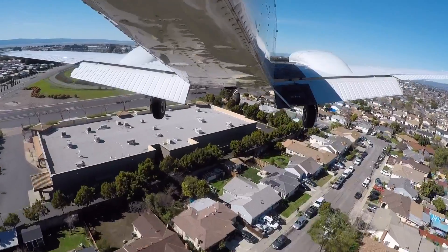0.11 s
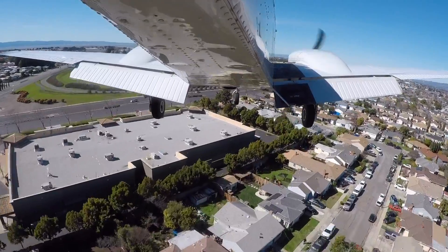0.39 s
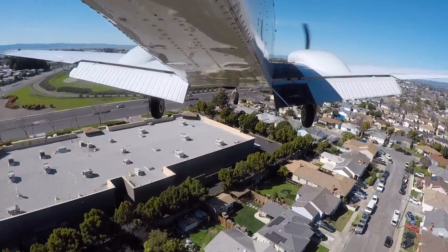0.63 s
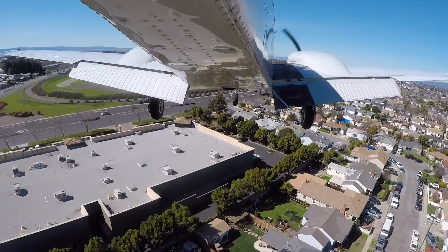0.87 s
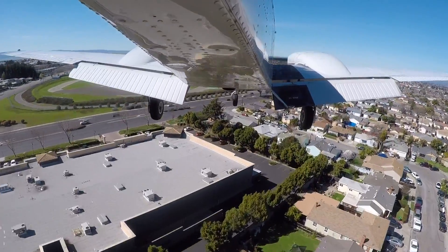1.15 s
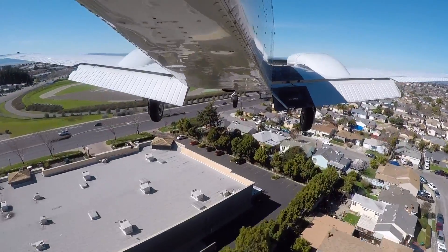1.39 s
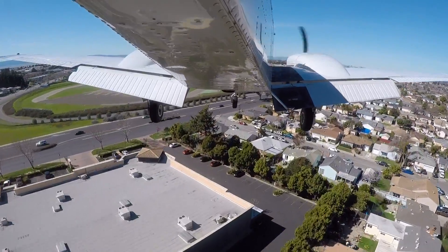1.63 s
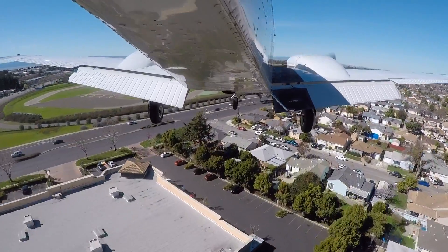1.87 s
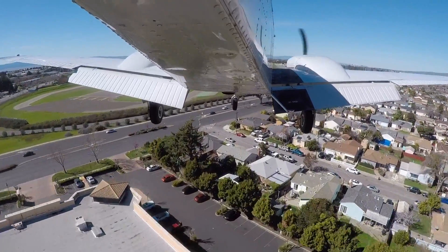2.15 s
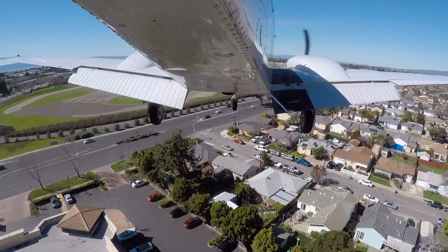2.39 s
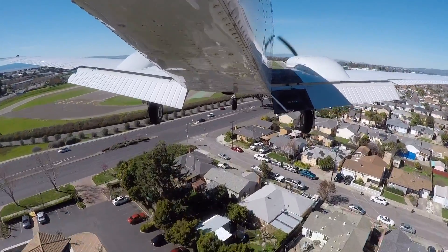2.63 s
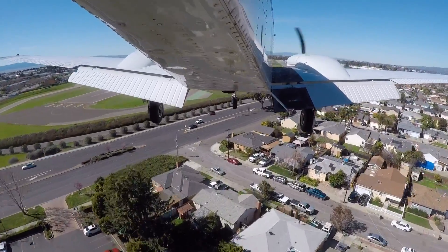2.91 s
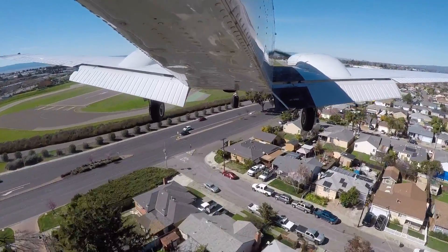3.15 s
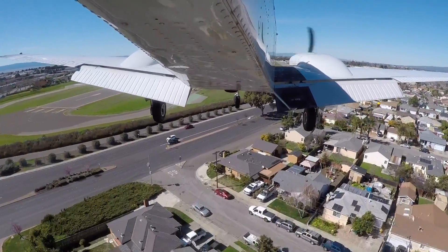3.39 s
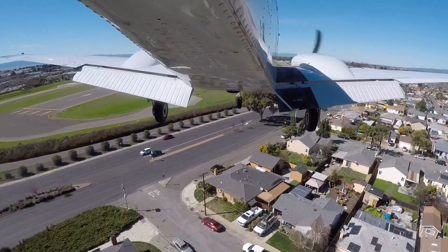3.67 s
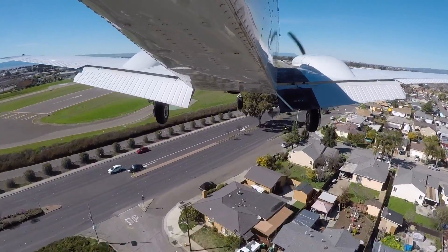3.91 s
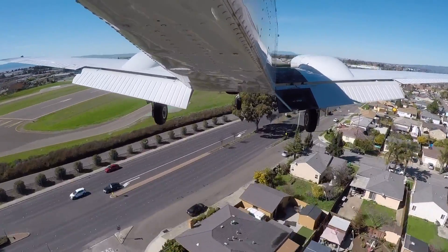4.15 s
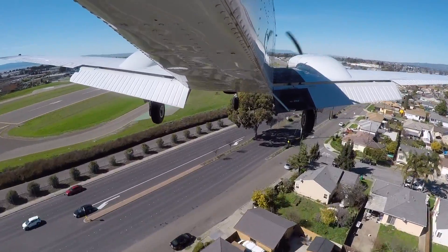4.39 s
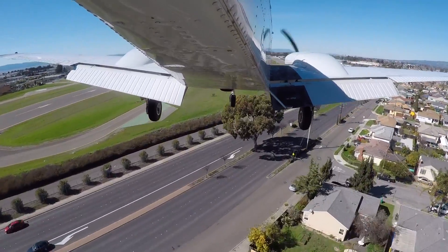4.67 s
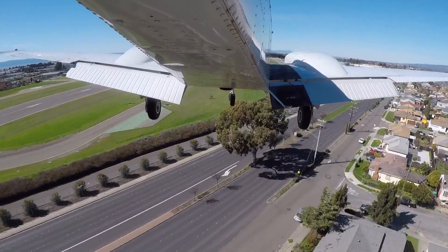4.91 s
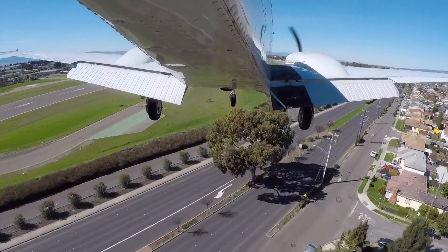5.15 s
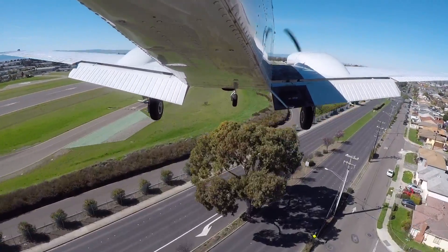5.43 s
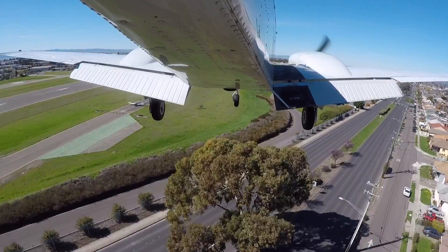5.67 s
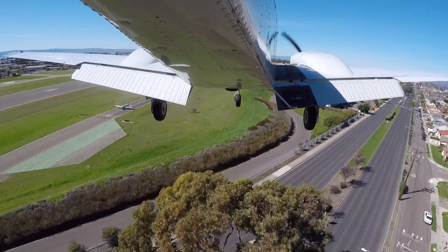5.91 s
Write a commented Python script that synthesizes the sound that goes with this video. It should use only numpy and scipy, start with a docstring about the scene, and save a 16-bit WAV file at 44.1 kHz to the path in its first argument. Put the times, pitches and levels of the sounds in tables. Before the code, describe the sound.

Heard from under the tail of a twin-propeller plane on low approach: two piston engines hold a loud, low buzzing drone at nearly the same pitch, slowly beating against each other. Behind it lies a steady slipstream roar with slightly fluttering bass and a breathy, whistling band of air across the camera housing. Nothing starts or stops; the small onboard microphone sounds compressed and saturated.

```python
"""The heavy drone of a twin piston aircraft on final approach, heard by a small camera microphone under its tail.
Two four-cylinder engines with two-blade propellers run a few rpm apart: one sine per order and engine, so orders beat.
Shaped noise makes the slipstream's roar, the cavities it blows across and thin high whistles.
A two-band gain control leans against the beats."""
import sys
import numpy as np
from scipy import signal
from scipy.fft import rfft, irfft, next_fast_len
from scipy.io import wavfile

SR = 44100
rng = np.random.default_rng(int(sys.argv[2]) if len(sys.argv) > 2 else 0)


def boost_factor(decibels):
    """Convert a level in decibels to a linear amplitude factor."""
    exponent = np.asarray(decibels, float) / 20
    return 10 ** exponent


def waveform_to_disk(signal):
    """Save audio, clipped to [-1, 1], as 16-bit WAV at the path in sys.argv[1]."""
    frames = np.transpose(np.atleast_2d(signal))
    scaled = np.clip(frames, -1, 1) * 32767
    samples = np.round(scaled).astype(np.int16)
    wavfile.write(sys.argv[1], SR, samples)


N = 266805


def rms_one(x):
    """Scale to rms 1."""
    return x / np.sqrt(np.mean(x ** 2) + 1e-20)


def at_hz(points, hz):
    """Read a table on a log-frequency axis."""
    table_hz, values = np.array(points).T
    return np.interp(np.log(hz), np.log(table_hz), values)


def drift(corner_hz, size=N):
    """Slow noise of rms 1 through two equal one-pole lowpasses; spans the whole scene in size points."""
    r = np.exp(-200 * np.pi * corner_hz / SR)  # runs at SR / 100
    noise = rng.standard_normal(N // 100 + 1002)
    slow = signal.lfilter([1], [1, -2 * r, r * r], noise)[1000:]  # filter has settled
    return np.interp(np.linspace(0, len(slow) - 1, size), np.arange(len(slow)), rms_one(slow))


# Clear orders of the four-stroke cycle, 4 = firing and blade pass. Each row: order, left engine level in dB
# before DRONE_DB, right engine level likewise, time in seconds at which both swell together.
CLEAR_ORDERS = [(2, -46, -34, .05), (3, -39, -41, 1.83), (4, -16, -22.3, 1.13), (5, -30, -32.5, 2.31),
                (6, -33.4, -27.3, 2.79), (7, -40.5, -45, 2.01), (8, -30.7, -22, 2.88), (11, -40, -40, 2.61),
                (12, -33, -35, 2.43), (13, -32, -42, 2.45), (14, -39, -37, 3.4), (15, -45, -40, 2.64),
                (16, -39, -36, 2.84), (17, -39, -47, 2.92), (18, -38, -48, 3.29), (20, -33, -34, 3.16),
                (24, -44, -40, 2.85), (32, -47, -55, 3.09)]
# All other orders up to 60, scattered round one slope. Each row: frequency in Hz, level in dB before DRONE_DB.
FAINT_ORDERS = [(200, -46), (400, -48), (600, -53), (850, -60.5), (1250, -69)]
# Phase smear of each firing by pipes and airframe: turns per order, turns per order squared.
FIRING_SMEAR = (.082, -.025)
# Phase shift from unequal cylinders: turns for order remainder 0, 1, 2, 3 of 4.
CYLINDER_SHIFT = (-.067, -.36, .059, -.294)
# Right governor hunts above the left speed. Each row: time in seconds, lead in rpm.
RIGHT_LEAD = [(0, 9.3), (.5, 8.4), (1.0, 6.2), (1.6, 8.3), (3.0, 7.7), (3.5, 9.8), (4.05, 7.3), (4.55, 8.1),
              (5.05, 11.2), (5.55, 7.0), (6.05, 6.7)]
# Balance of the ports, for engines and noise. Each row: frequency in Hz, left minus right in dB.
PORT_BALANCE = [(60, .5), (120, .7), (250, 2.2), (550, 3.4), (1240, 1.6), (2500, .6), (4500, 2.4),
                (8000, 1.5), (12500, -.2)]
LEFT_START_RPM, LEFT_RISE_RPM_PER_S = 2498.9, .45
DRONE_DB, FAINT_SCATTER_DB = -2.5, 3.0
WAVER_DB, WAVER_TURNS = 0.57, 0.014  # rms at order 4
PORT_SKEW_TURNS = 0.053  # spread at order 22


def engines():
    """One sine per order and engine; each pair falls into step at its swell time and beats at the speed gap."""
    step = 10  # runs at SR / 10
    t = np.arange(N // step + 1) * step / SR
    left_rpm = LEFT_START_RPM + LEFT_RISE_RPM_PER_S * t
    right_rpm = left_rpm + np.interp(t, *np.transpose(RIGHT_LEAD))
    # one cycle = two shaft turns
    left_cycles, right_cycles = np.cumsum([left_rpm, right_rpm], axis=1) * step / SR / 120
    cycle_hz = LEFT_START_RPM / 120
    clear = [row[0] for row in CLEAR_ORDERS]
    faint = []
    for order in range(2, 61):
        if order not in clear:
            levels_db = at_hz(FAINT_ORDERS, order * cycle_hz) + FAINT_SCATTER_DB * rng.normal(size=2)
            faint.append((order, *levels_db, rng.random() * N / SR))
    out = np.zeros((2, len(t)))
    for order, left_db, right_db, swell_s in list(CLEAR_ORDERS) + faint:
        ahead = np.interp(swell_s, t, right_cycles - left_cycles)
        smear = order * FIRING_SMEAR[0] + order ** 2 * FIRING_SMEAR[1] + CYLINDER_SHIFT[order % 4]
        pan_db = at_hz(PORT_BALANCE, order * cycle_hz)
        pan = boost_factor([[pan_db / 2], [-pan_db / 2]])
        # turbulence on the way: strength and phase waver, more so for short waves
        waver = np.sqrt(order / 4)
        for level_db, cycles in ((left_db, left_cycles), (right_db, right_cycles - ahead)):
            turns = order * cycles + smear + WAVER_TURNS * waver * drift(2.15, size=len(t))
            waver_db = WAVER_DB * waver * drift(2.2, size=len(t))
            gain = np.sqrt(2) * boost_factor(DRONE_DB + level_db + waver_db)
            # short waves reach the two ports out of step; the level is that of their mean
            skew = PORT_SKEW_TURNS * min((order / 22) ** 2, 1.5) * rng.normal()
            ports = pan * np.exp(2j * np.pi * skew * np.array([[1], [-1]]))
            out += gain * np.real(ports / np.mean(ports) * np.exp(2j * np.pi * turns))
    return signal.resample_poly(out, step, 1, axis=1)[:, :N]


# Noise shared between the ports. Each row: frequency in Hz, likeness from 0 to 1.
PORT_LIKENESS = [(40, .998), (100, 0.85), (250, 0.83), (600, 0.8), (1200, 0.85), (2300, 0.65), (3100, 0.92),
                 (3600, 0.56), (4500, 0), (8000, .3), (12500, 0.33)]
LEFT_PORT_LAG_S = 5e-5


def port_noise(gain_at):
    """Stereo air noise of rms 1 coloured by gain_at(hz), partly shared by the ports; the left hears it later."""
    size = next_fast_len(N)
    hz = np.maximum(np.arange(size // 2 + 1) * SR / size, 1)
    mid, side = rfft(rng.standard_normal((2, size)))
    alike = np.clip(at_hz(PORT_LIKENESS, hz), 0, 1)
    shared = np.sqrt(1 + alike) * mid
    apart = np.sqrt(1 - alike) * side
    pan = boost_factor(at_hz(PORT_BALANCE, hz) / 2)
    left = (shared + apart) * pan * np.exp(-2j * np.pi * hz * LEFT_PORT_LAG_S)
    right = (shared - apart) / pan
    return rms_one(irfft(gain_at(hz) * np.array([left, right]), size)[:, :N])


# Slipstream spectrum. Each row: frequency in Hz, relative density in dB.
ROAR_COLOUR = [(20, 7), (40, 15), (65, 10.5), (110, 14), (200, 9.5), (400, 7), (700, -1.5), (950, -2),
               (2100, -2), (3700, -5.5), (7900, -16.5), (9000, -20), (10500, -31.5), (11500, -25.5),
               (12700, -14), (13300, -22)]
ROAR_DB = -29.5


def slipstream():
    """Broad noise roar; its lumpy bass and its top flutter apart from the smooth middle."""
    roar = port_noise(lambda hz: boost_factor(at_hz(ROAR_COLOUR, hz)))
    low = signal.sosfilt(signal.butter(2, 60, fs=SR, output="sos"), roar)
    top = signal.sosfilt(signal.butter(4, 10500, "high", fs=SR, output="sos"), roar)
    low_flutter = low * (boost_factor(1.3 * drift(4.6)) - 1)
    top_flutter = top * (boost_factor(1.4 * drift(5.0)) - 1)
    return boost_factor(ROAR_DB) * (roar + low_flutter + top_flutter)


def resonance(centre_hz, width_hz):
    """Noise twice through one resonance, rms 1."""
    return port_noise(lambda hz: 1 / (1 + (2 * (hz - centre_hz) / width_hz) ** 2))


# Housing cavities that the air blows across. Each row: centre in Hz, width in Hz, mean level in dB.
HOUSING_CAVITIES = [(2413, 110, -45.5), (2533, 203, -35.5), (2626, 54, -40.5), (2698, 82, -40),
                    (2857, 77, -38), (2957, 91, -36.5), (3098, 110, -40.5), (3260, 230, -42.5),
                    (3507, 52, -51)]


def cavities():
    """Each cavity sings as a narrow band of noise that flickers on its own."""
    return sum(boost_factor(db + 0.34 * drift(6.9)) * resonance(hz, width_hz)
               for hz, width_hz, db in HOUSING_CAVITIES)


# Thin high whistles. Each row: peak time in seconds, centre in Hz, peak level in dB, length in seconds.
HIGH_WHISTLES = [(.6, 12730, -65, 1.0), (1.7, 12300, -66, .8), (3.5, 12270, -58, 1.2),
                 (4.9, 12650, -64, .9)]


def whistles():
    """Very narrow, faint noise bands near the top, each under a bell-shaped swell."""
    t = np.arange(N) / SR
    out = np.zeros((2, N))
    for peak_s, hz, peak_db, length_s in HIGH_WHISTLES:
        swell = np.exp(-(2 * (t - peak_s) / length_s) ** 2)
        out += boost_factor(peak_db) * swell * resonance(hz, width_hz=60)
    return out


def scene():
    """Drone, roar, cavities and whistles."""
    return engines() + slipstream() + cavities() + whistles()


def loudness_db(x, time_s):
    """Running mean power of both channels in dB, started from the first 0.1 s."""
    power = np.mean(x ** 2, axis=0)
    r = np.exp(-1 / (time_s * SR))
    start = [r * np.mean(power[:SR // 10])]
    smooth = signal.lfilter([1 - r], [1, -r], power, zi=start)[0]
    return 10 * np.log10(smooth + 1e-12)


def band_limit(x):
    """A steep low-pass at the top of the band."""
    return signal.sosfilt(signal.butter(12, 13550, fs=SR, output="sos"), x)


def record(dry):
    """Two-band gain control: full-band loudness turns the bass down fast and strongly, the rest slower and less."""
    bass = signal.sosfiltfilt(signal.butter(2, 210, fs=SR, output="sos"), dry)
    bass_gain_db = -.85 * (loudness_db(dry, time_s=0.068) + 12.0)
    rest_gain_db = -.6 * (loudness_db(dry, time_s=0.31) + 11.5)
    levelled = bass * boost_factor(bass_gain_db) + (dry - bass) * boost_factor(rest_gain_db)
    rounded = 1.422 * np.tanh(levelled / 1.362)  # softens the highest peaks
    return band_limit(rounded)


dry = scene()
out = record(dry)
waveform_to_disk(out)
```